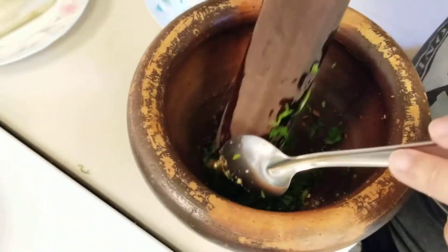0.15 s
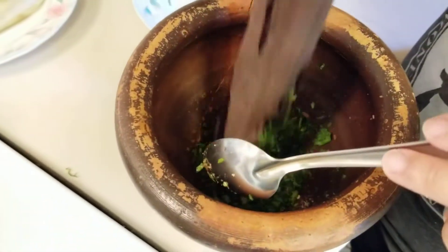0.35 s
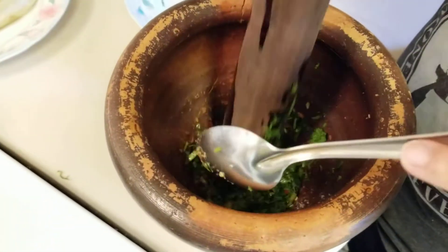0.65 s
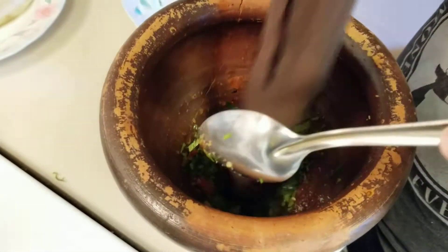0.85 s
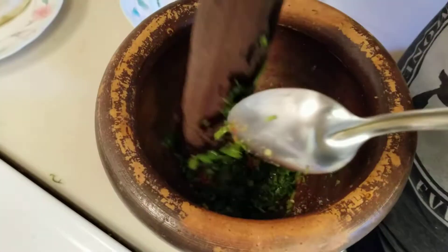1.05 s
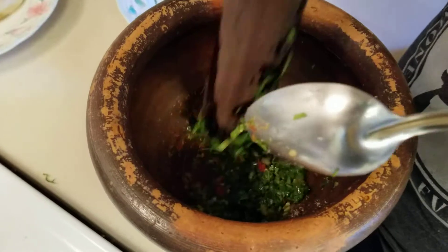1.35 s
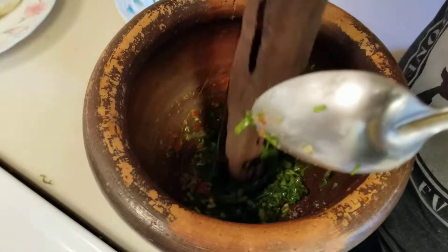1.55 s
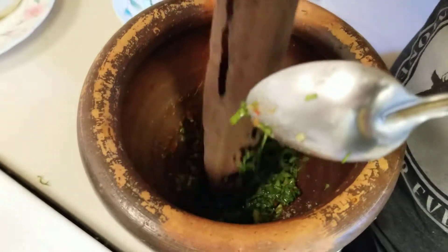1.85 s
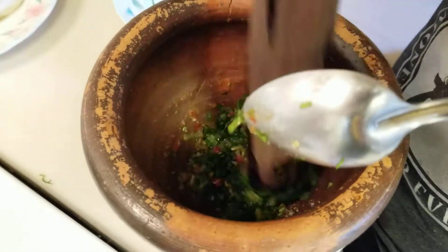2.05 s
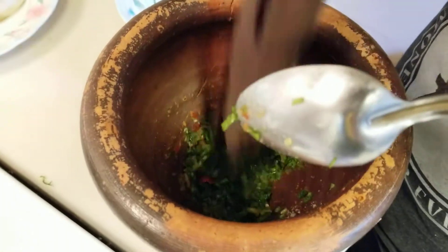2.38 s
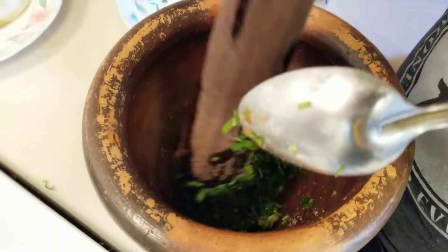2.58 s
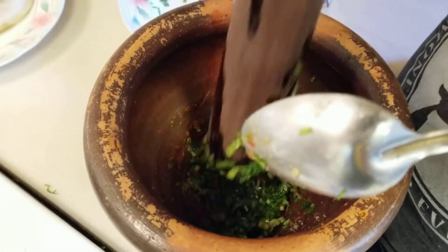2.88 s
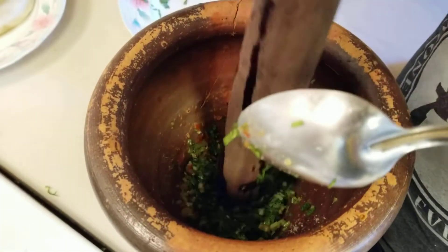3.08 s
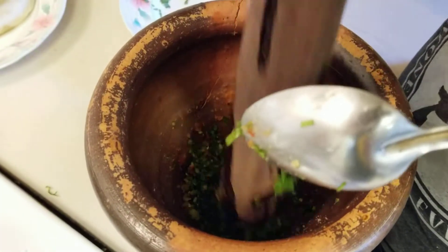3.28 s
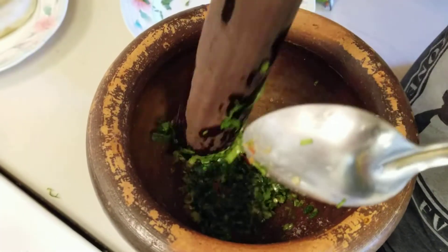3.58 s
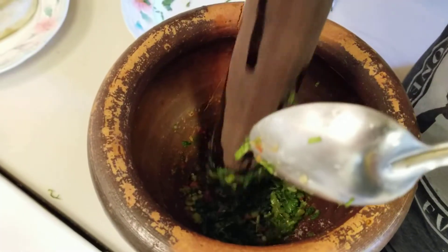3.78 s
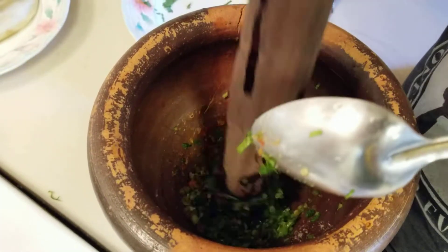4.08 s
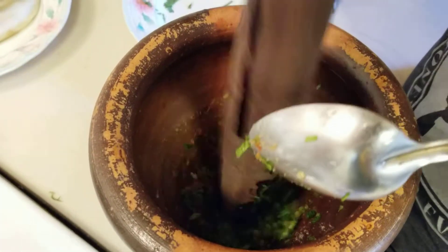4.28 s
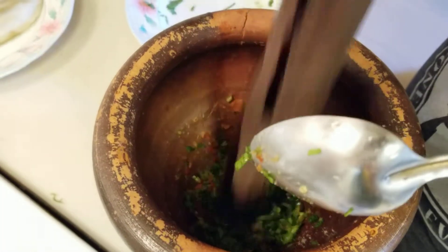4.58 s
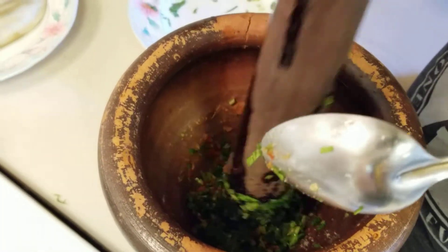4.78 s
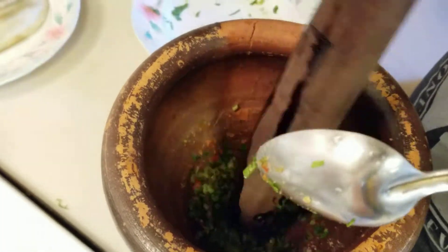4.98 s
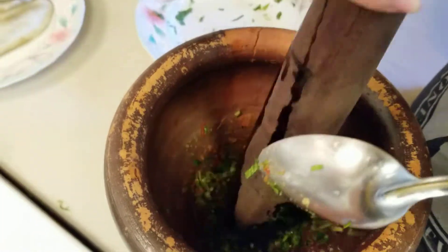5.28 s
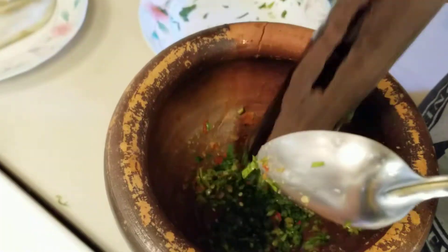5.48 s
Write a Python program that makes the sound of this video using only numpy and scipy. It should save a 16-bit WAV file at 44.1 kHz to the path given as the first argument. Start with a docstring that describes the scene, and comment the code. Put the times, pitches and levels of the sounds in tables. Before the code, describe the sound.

A wooden pestle pounds wet herbs in a wooden mortar about three times a second, mixing dull thuds, woody knocks and juicy squelches.

```python
"""Pestle and mortar

A wooden pestle pounds wet herbs and chili in a wooden mortar on a kitchen counter, three blows a second.
Leaves cushion some blows to a dull thud; others reach the wood and knock: short pushes ring fading tones.
Shaped noise makes the wet slap, squelch and spray; resonant air pockets make the suck on lifting and a few
squeaks. Sparse, fading echoes make a small kitchen, over a soft rush of air."""
import sys
import numpy as np
from scipy import signal
from scipy.fft import rfft, irfft
from scipy.io import wavfile
from scipy.ndimage import uniform_filter1d

SR = 44100
rng = np.random.default_rng(int(sys.argv[2]) if len(sys.argv) > 2 else 0)


def materialize(psi):
    """Save the field psi as 16-bit PCM at rate SR to the path in sys.argv[1].

    A 1-D psi becomes a single channel; in a 2-D psi each row is a channel.
    """
    bounded = np.clip(np.atleast_2d(psi).T, -1, 1)
    quanta = np.round(bounded * 32767).astype(np.int16)
    wavfile.write(sys.argv[1], SR, quanta)


N = 248724

# Strokes of the pestle; the levels are relative, set further by each layer:
# (start_s, force_db, contact_hardness_hz, wet_slap_db, squirt_pitch_hz, squeeze_db,
#  time_to_sink_through_paste_s, suck_on_lifting_db)
BLOWS = [(-.06, -1, 4600, -39, 11000, -53, 0.047, -53), (0.209, -9.5, 161, -39, 2920, -36.5, 0.024, -47),
         (.500, -4.5, 477, -35, 11700, -35, 0.043, -40.5), (.826, -7, 214, -29, 10800, -38, 0.03, -47),
         (1.1266, 2.5, 755, -27, 2730, -31.5, 0.048, -40), (1.442, 4, 230, -17, 4260, -34.5, 0.034, -34.5),
         (1.7473, 3.5, 1000, -28, 2720, -31, .026, -37),
         (2.053, 1.5, 430, -24.5, 11200, -33.5, 0.037, -36.5),
         (2.348, 2, 5160, -43, 14500, -38.5, 0.055, -35),
         (2.6803, -9, 1100, -35.5, 11100, -37.5, 0.023, -46),
         (2.985, -5.5, 1750, -22, 9300, -43, 0.038, -43),
         (3.303, -9.5, 216, -35.5, 11150, -39.5, 0.039, -44.5),
         (3.595, 0.5, 870, -48, 11900, -37, .051, -34), (3.932, 0, 244, -19.5, 5750, -39, 0.035, -38.5),
         (4.246, -6, 163.2, -31, 2860, -33, 0.031, -37.5), (4.529, 3, 2250, -33, 13900, -35.5, 0.059, -36),
         (4.879, 0, 242, -23, 13400, -36.5, 0.044, -40), (5.1868, 1.5, 1170, -34, 11000, -37.5, 0.05, -37),
         (5.467, -1, 1560, -32.5, 12100, -39, 0.074, -36.5)]


def amp(db):
    """Turns decibels into gain."""
    return 10 ** (np.asarray(db) / 20)


def unit(x):
    """Scales a sound to an rms (average strength) of 1."""
    return x / np.sqrt(np.mean(x ** 2) + 1e-20)


def read(points, hz):
    """Reads a table along a logarithmic frequency axis."""
    f, value = np.transpose(points)
    return np.interp(np.log(hz + 1), np.log(f + 1), value)


def pan(db):
    """Gives left and right gains for a level difference."""
    return amp([[db / 2], [-db / 2]])


def add(mix, start_s, sound):
    """Adds a stereo sound to the mix, cutting off whatever falls outside."""
    start = round(start_s * SR)
    sound = sound[:, max(-start, 0):]
    part = mix[:, max(start, 0):][:, :sound.shape[1]]
    part += sound[:, :part.shape[1]]


def colour(x, spectrum):
    """Gives white sound a spectrum and keeps its power; the filter never acts early, so clicks stay sharp."""
    size = 4096
    hz = abs(np.fft.fftfreq(size, 1 / SR))
    gain = unit(amp(read(spectrum, hz)))
    # minimum phase: the filter's energy comes as early as it can
    log_response = np.conj(signal.hilbert(np.log(gain)))
    taps = np.fft.ifft(np.exp(log_response)).real[:size // 2]
    return signal.oaconvolve(x, taps[None], axes=1)[:, :x.shape[1]]


def pair(x):
    """Makes two unrelated channels alike in the bass, as at two close microphones."""
    # likeness of the two microphones: (pitch_hz, likeness_0_to_1)
    likeness = [(60, 0.9), (250, 0.97), (1000, 0), (3000, 0), (12000, 0)]
    left, other = rfft(x)
    same = np.clip(read(likeness, np.fft.rfftfreq(x.shape[1], 1 / SR)), 0, 1)
    right = same * left + np.sqrt(1 - same ** 2) * other
    return irfft(np.array([left, right]), x.shape[1])


def crackle(spread_db, size=N, clump_db=1.9):
    """Countless tiny bursts of uneven strength, bunched in clumps as one leaf after another gives way."""
    bursts, clumps = rng.standard_normal((2, size))
    # smoothing lengths in samples
    bursts = np.clip(unit(uniform_filter1d(bursts, size=24)), -2, 2)
    clumps = np.clip(unit(uniform_filter1d(clumps, size=260)), -2, 2)
    noise = pair(rng.standard_normal((2, size)))
    return unit(noise * amp(spread_db * bursts + clump_db * clumps))


def ring(t, hz, db, t60):
    """One fading tone of a struck object; it drops 60 dB in t60 seconds."""
    return amp(db) * np.exp(-np.log(1000) * t / t60) * np.sin(2 * np.pi * hz * t)


def pocket(x, hz, sharpness):
    """The resonance of a small pocket of air, at rms 1."""
    return unit(signal.lfilter(*signal.iirpeak(hz, sharpness, SR), x))


def knocks():
    """Each contact is a push, short on bare wood and long on leaves, that rings the mortar and the counter."""
    # the counter under the mortar: (pitch_hz, level_db, fade_by_60_db_s)
    counter_modes = [(46.7, -54, 0.36), (64.2, -29.5, 0.32), (101.7, -32.5, 0.27), (122, -27, 0.18),
                     (147.3, -28.5, 0.22), (178.3, -37.5, 0.21), (243.5, -31.5, 0.19), (263.8, -31, 0.18),
                     (315.5, -32, 0.16), (403.3, -24, 0.073)]
    # mortar and pestle: (pitch_hz, level_db, fade_by_60_db_s)
    wood_modes = [(484, -25, 0.24), (592, -15, 0.079), (619.4, -27.5, 0.63), (625.6, -24.5, 0.38),
                  (867, -28.5, 0.097), (900, -25, 0.051), (1078, -20.5, 0.021), (1095, -22, .26),
                  (1149, -25, .26), (1230, -20, .04), (1458, -23, .13), (1588, -19, .17), (1743, -22, 0.12),
                  (1814, -22, 0.03), (2200, -18.5, 0.032), (2640, -18, 0.046), (3086, -24, 0.057),
                  (3600, -27.5, 0.03), (3700, -49, 0.043)]
    # spectrum of the crack: (pitch_hz, relative_level_per_hz_db)
    crack_spectrum = [(200, -55), (500, -10.5), (780, -6), (1150, 5.5), (1380, -4), (1600, 0.5),
                      (2000, -11), (2600, -11.5), (3700, -16), (4600, -31), (7000, -25), (16000, -37.5)]
    counter_rise_s, rock_delay_s = 0.0035, 0.0077
    snap_db, snap_decay_s = -16, 0.0017
    rattle_db, rattle_decay_s = -22, 0.058
    cushion_s, cushion_hz = 0.0388, 181.3
    bare_wood_db, muffle_db, muffle_hz = 2, -4, 280
    choke_s, bare_hz = 0.0069, 2820

    t = np.arange(SR * 3 // 5) / SR
    counter = sum(ring(t, *mode) for mode in counter_modes) * (1 - np.exp(-t / counter_rise_s))
    # the mortar rocks and settles back on its foot a moment later
    counter = counter + ring(np.maximum(t - rock_delay_s, 0), hz=227.4, db=-26.5, t60=0.068)
    # neighbouring modes move the struck spot in opposite directions
    modes = np.array([(-1) ** k * ring(t, *mode) for k, mode in enumerate(wood_modes)])
    # the many damped modes merge into a crack: a snap, then a short rattle inside the bowl
    snap = amp(snap_db) * np.exp(-t / snap_decay_s)
    rattle = amp(rattle_db) * np.exp(-t / rattle_decay_s)
    out, contact = np.zeros((2, N)), t[:SR // 50]
    for s, force_db, hard_hz, *_ in BLOWS:
        # leaves under the pestle: the softer the contact, the later the thud and the less the wood rings
        lag = cushion_s / (1 + (hard_hz / cushion_hz) ** 10)
        wood_db = bare_wood_db + muffle_db * muffle_hz / hard_hz
        # paste chokes the ring of the bowl, much less when the contact is harder than bare_hz
        choke = choke_s * (1 + (hard_hz / bare_hz) ** 3)
        # the mix of modes (1 dB spread) and the crack differ with the struck spot
        wood = amp(1 * rng.standard_normal(len(wood_modes))) @ modes
        noise = pair(rng.standard_normal((2, len(t))))
        crack = colour(noise * (snap + rattle), crack_spectrum)
        # bare wood is met higher on the wall, where the lowest modes move less
        wall_filter = signal.butter(1, hard_hz * 0.17, "high", fs=SR)
        bowl = signal.lfilter(*wall_filter, wood + crack)
        body = counter + amp(wood_db) * np.exp(-t / choke) * bowl
        push = contact ** 2 * np.exp(-2 * np.pi * hard_hz * contact)
        struck = signal.fftconvolve(body, push[None] / push.sum(), axes=1)
        add(out, s + lag, amp(force_db) * struck)
    return out


def froth(low_hz=1500, high_hz=6000, per_s=330, cycles=6, spread_db=5, count=24):
    """Small bubbles in the juice: each rings a few cycles and rises in pitch."""
    t, out = np.arange(SR // 60) / SR, np.zeros((2, N))
    for hz in np.geomspace(low_hz, high_hz, count):
        age = hz * t / cycles
        start = rng.uniform(-np.pi, np.pi, (2, 1))  # each pitch reaches the two microphones by its own path
        swell_and_fade = np.exp(-age) * (1 - np.exp(-10 * age))
        blip = swell_and_fade * np.sin(2 * np.pi * hz * t * (1 + age / 60) + start)
        strength = amp(spread_db * np.minimum(rng.exponential(1, N), 2))
        births = (rng.random(N) < per_s / count / SR) * strength
        out += signal.oaconvolve(births[None], blip, axes=1)[:, :N]
    return unit(out)


def paste():
    """A wet slap and squirt at touch, then a frothy squelch that swells until the pestle stops, with spray."""
    # spectra of the wet sounds: (pitch_hz, relative_level_per_hz_db)
    slap_spectrum = [(200, -30.5), (1000, -18), (1500, -6), (2050, -7.5), (3000, -5.5), (5400, -10),
                     (7500, -7.5), (10000, -0.5), (16000, -4)]
    squeeze_spectrum = [(150, -17.5), (620, 4.5), (850, -3), (1400, 2), (1700, -6), (2200, 1.5), (3000, 2),
                        (4200, 1), (5500, -2.5), (7500, -13), (16000, -59)]
    spray_spectrum = [(300, -59), (1500, 5), (3000, 10), (5500, 3), (8000, 2), (10000, 7.5), (12500, 6.5),
                      (16000, 3.5)]
    slap_gain_db, squirt_gain_db, squelch_gain_db, froth_gain_db = 1.5, -8.0, 0.5, -4
    touch_s, slap_decay_s = 0.00077, 0.0061
    build_s, release_s = 0.022, 0.012
    spray_start, spray_decay_s = 0.6, 0.0095  # spray_start: share of its peak at first touch

    slap, squeeze, spray = np.zeros((3, N))
    squirt = np.zeros((2, N))
    for s, force_db, _, hit_db, squirt_hz, squeeze_db, tightest, _ in BLOWS:
        # spray grows with the squeeze and with the force
        spray_db = -11.5 + 0.6 * squeeze_db + 0.33 * force_db
        near = slice(max(int((s - .02) * SR), 0), int((s + .2) * SR))
        t = np.arange(N)[near] / SR - s
        touching = np.exp(np.minimum(t, 0) / touch_s)
        before, after = np.maximum(tightest - t, 0), np.maximum(t - tightest, 0)
        slap[near] += amp(hit_db) * touching * np.exp(-np.maximum(t, 0) / slap_decay_s)
        noise = pair(rng.standard_normal((2, len(t))))
        squirt[:, near] += slap[near] * pocket(noise, squirt_hz, sharpness=7)
        squeeze[near] += amp(squeeze_db) * touching * np.exp(-before / build_s - after / release_s)
        spray_shape = spray_start ** (before / tightest) * np.exp(-after / spray_decay_s)
        spray[near] += amp(spray_db) * touching * spray_shape
    splash = colour(slap * crackle(spread_db=2), slap_spectrum)
    squelch = colour(squeeze * crackle(spread_db=7, clump_db=3), squeeze_spectrum)
    foam = squeeze * froth()
    fizz = colour(spray * crackle(spread_db=3.5), spray_spectrum)
    wet_hit = amp(slap_gain_db) * splash + amp(squirt_gain_db) * squirt
    return wet_hit + amp(squelch_gain_db) * squelch + amp(froth_gain_db) * foam + fizz


def kitchen(x):
    """Sparse reflections from walls and cupboards, each band dying at its own speed."""
    # echo decay: (pitch_hz, fade_by_60_db_s)
    decay_times = [(100, 0.87), (400, 0.38), (1200, 0.32), (3000, 0.28), (8000, 0.29), (16000, 0.16)]
    echo_levels = [(250, -20), (1200, -10), (10000, -10)]  # (pitch_hz, level_db)
    first_s = 0.014
    size = SR // 2
    signs = rng.choice([-1., 1.], (2, size))
    chosen = rng.random((2, size)) < 1 / 12
    taps = signs * chosen * (np.arange(size) / SR > first_s)
    hz, t, z = signal.stft(pair(taps), SR, nperseg=256)
    decay = np.exp(-np.log(1000) * t / read(decay_times, hz)[:, None])
    tail = signal.istft(z * decay, SR, nperseg=256)[1]
    echo = signal.fftconvolve(x.mean(0)[None], tail / np.linalg.norm(tail[0]), axes=1)[:, :N]
    wet = amp(read(echo_levels, np.fft.rfftfreq(N, 1 / SR)))
    return irfft(rfft(echo) * wet, N)


def background(level_db=3, pan_db=2, patchy_db=2.3):
    """A soft rush of air in the kitchen: shaped noise that wavers in patches of time and pitch."""
    # spectrum of the air: (pitch_hz, relative_level_per_hz_db)
    air_spectrum = [(15, -47), (25, -10.5), (76, -5.5), (206, -14.5), (277, -5), (560, -16.5), (734, -13.5),
                    (936, -17.5), (1190, -17), (2050, -20.5), (2610, -20), (3620, -22.5), (8590, -27.5),
                    (12200, -22.5), (16000, -26)]
    # its course in time, before level_db and pan_db: (time_s, level_db)
    air_level = [(0.0, -54.5), (0.92, -57.5), (1.36, -51.5), (2.4, -53.5), (2.76, -60), (3.61, -59.5),
                 (3.83, -55.5), (5.31, -54.5), (5.64, -56)]
    hz, _, z = signal.stft(pair(rng.standard_normal((2, N))), SR, nperseg=2048)
    patches = uniform_filter1d(rng.standard_normal(z.shape[1:]), size=40, axis=0)
    patches = unit(uniform_filter1d(patches, size=5, axis=1))
    shaped = z * amp(read(air_spectrum, hz)[:, None] + patchy_db * patches)
    hiss = unit(signal.istft(shaped, SR)[1][:, :N])
    course_db = np.interp(np.arange(N) / SR, *np.transpose(air_level))
    return hiss * amp(level_db + course_db) * pan(pan_db)


def bubbles(rows, sharpness, fizz_db):
    """Clusters of bursting films ring the air pocket around them."""
    out = np.zeros((2, N))
    t = np.arange(SR // 5) / SR - .1
    for s, db, hz, length in rows:
        bursts = crackle(spread_db=3.5, size=len(t))
        pop = pocket(bursts, hz, sharpness) + amp(fizz_db) * bursts
        add(out, s + t[0], amp(db) * pop * np.exp(-.5 * (t / length) ** 2))
    return out


def sucks(lift_s=0.031, suck_hz=2470, suck_s=0.0062, scatter=0.11):
    """An air pocket of chance size pops at each lift of the pestle, a moment after the tightest squeeze."""
    sizes = np.exp(scatter * rng.standard_normal(len(BLOWS)))
    pops = []
    for (s, *_, tightest, db), size in zip(BLOWS, sizes):
        # a larger pocket sounds lower and longer
        pops.append((s + tightest + lift_s, db, suck_hz / size, suck_s * size))
    return bubbles(pops, sharpness=2.03, fizz_db=-27.0)


def squeaks():
    """Faint squeaks of wet leaves: sharply tuned air pockets ring to bursts of crackle."""
    # squeaks: (centre_s, level_db, pitch_hz, length_s)
    leaf_squeaks = [(.96, -61, 3100, 0.024), (1.63, -54.5, 3060, 0.023), (3.18, -59, 3660, 0.02)]
    return bubbles(leaf_squeaks, sharpness=11, fizz_db=-28)


def scene():
    """Mortar and paste, close and mostly a little to the left, in the kitchen."""
    # how the bowl throws its sound toward the two microphones: (pitch_hz, left_minus_right_db)
    sides = [(60, 2.5), (300, 3.5), (570, 2.5), (900, 9), (1600, 10), (2300, 4), (4000, 6.5), (6000, 9.5),
             (8000, 7), (12000, -2), (16000, 10.5)]
    near = knocks() + paste() + sucks() + squeaks()
    side_db = read(sides, np.fft.rfftfreq(N, 1 / SR))
    direct = irfft(rfft(near) * amp([side_db / 2, -side_db / 2]), N)
    return direct + kitchen(near) + background()


def record(dry, ceiling=1.0, edge_hz=16000):
    """Peaks are softly rounded off, the loudest most; then a filter removes the top treble."""
    rounded = ceiling * np.tanh(dry / ceiling)
    band_limit = signal.firwin(511, edge_hz, window=("kaiser", 9), fs=SR)
    return signal.oaconvolve(rounded, band_limit[None], "same")


dry = scene()
out = record(dry)
materialize(out)
```